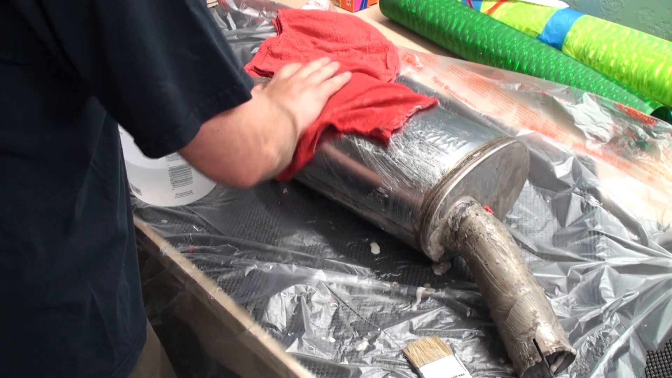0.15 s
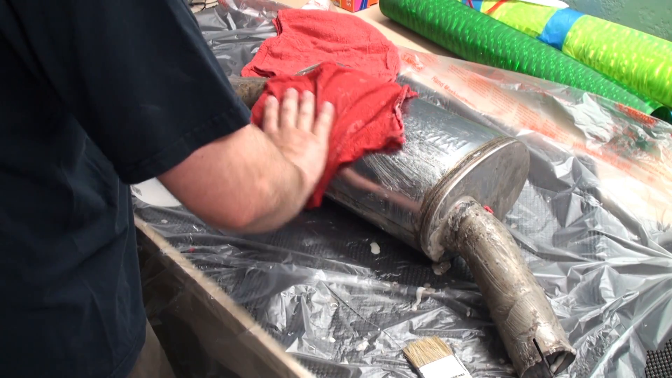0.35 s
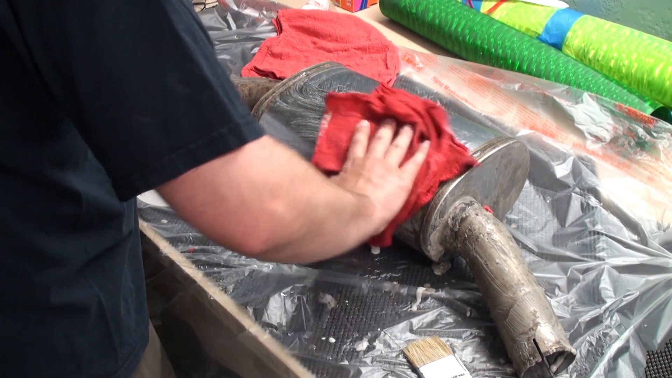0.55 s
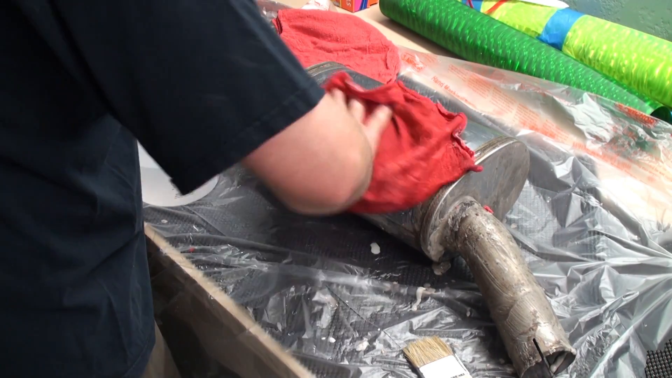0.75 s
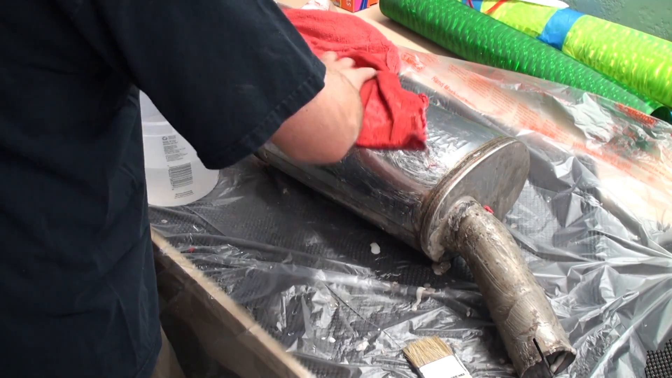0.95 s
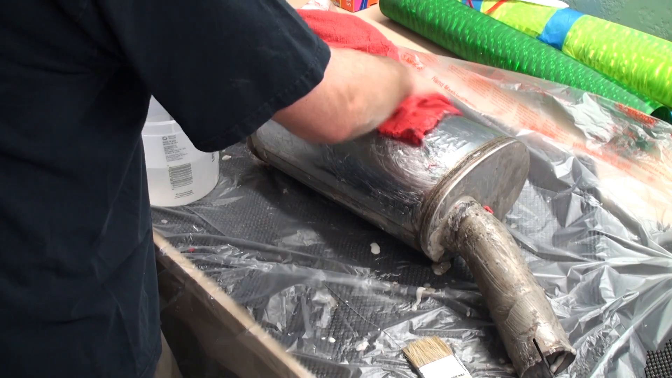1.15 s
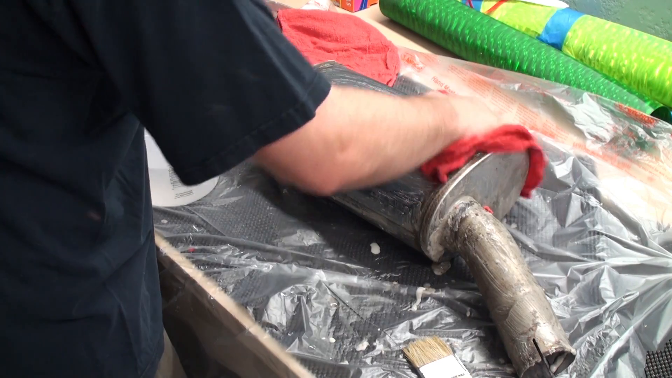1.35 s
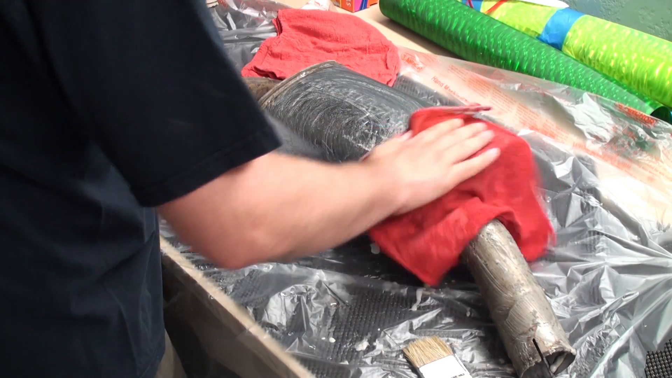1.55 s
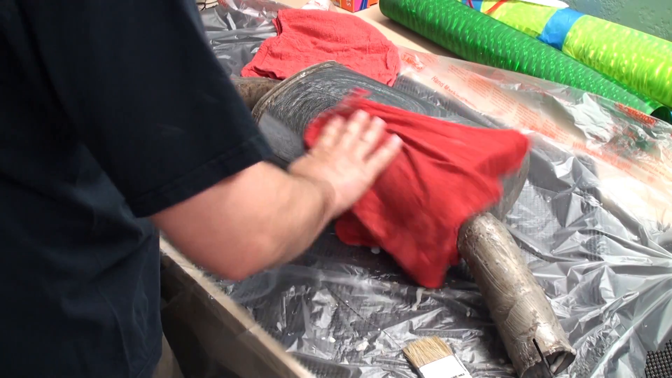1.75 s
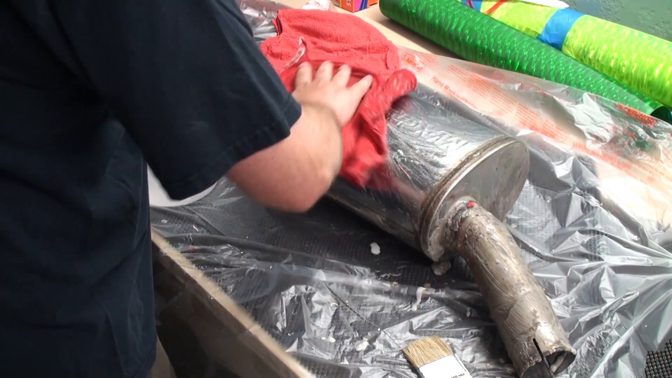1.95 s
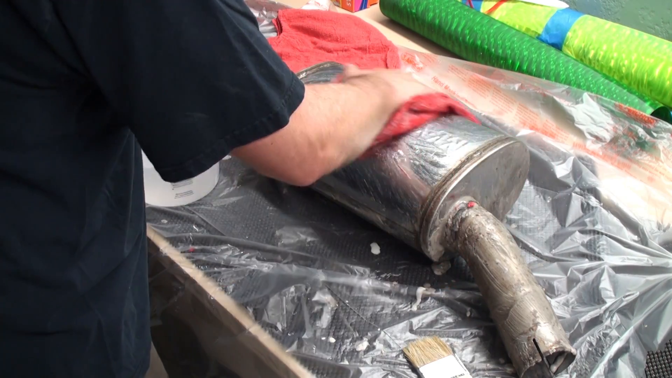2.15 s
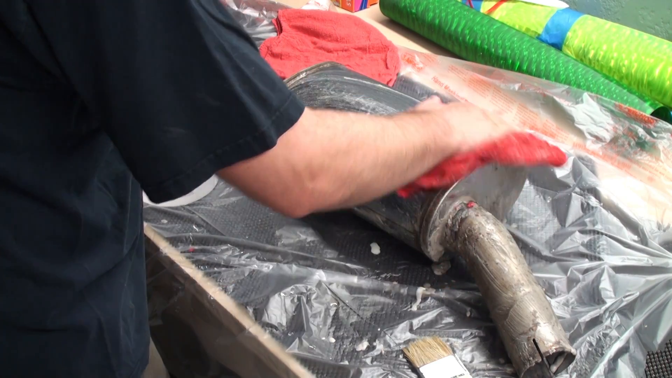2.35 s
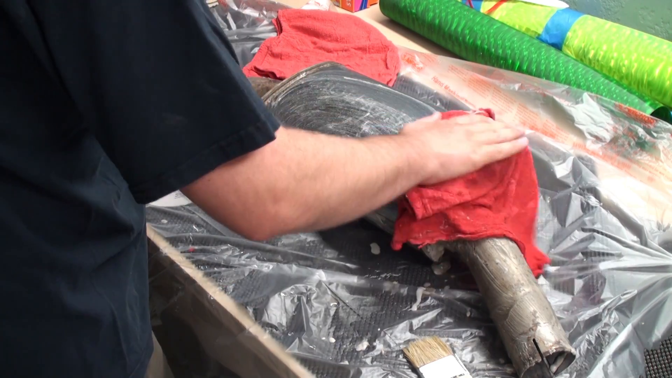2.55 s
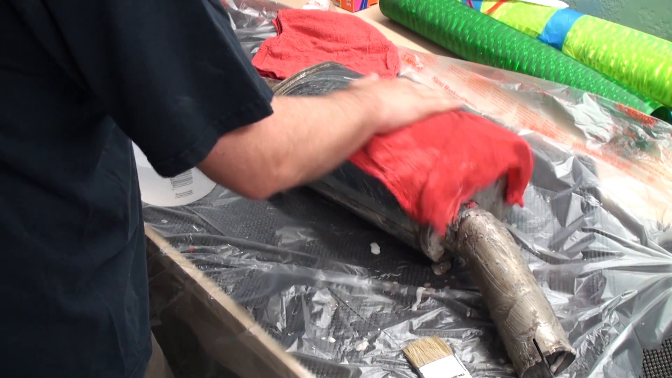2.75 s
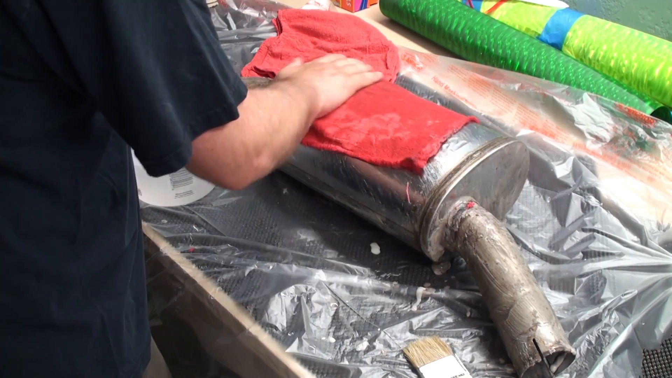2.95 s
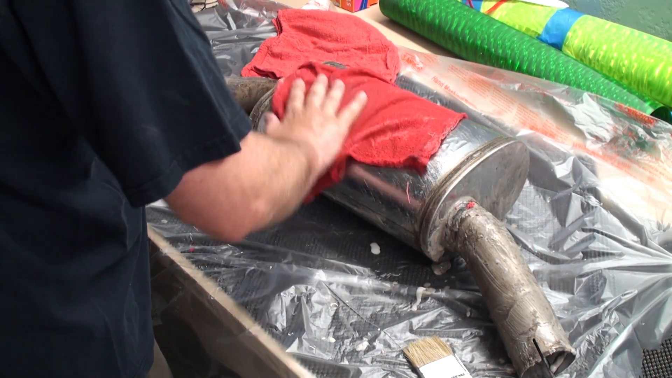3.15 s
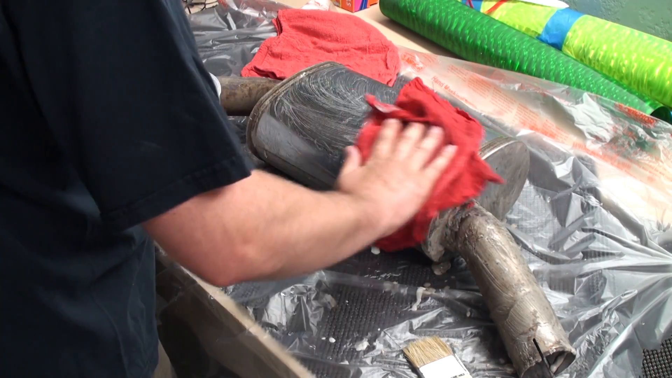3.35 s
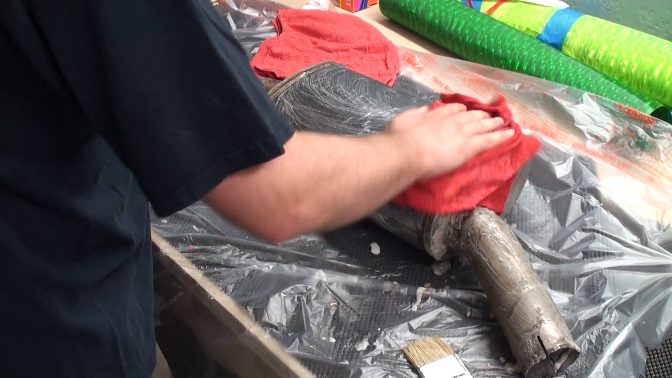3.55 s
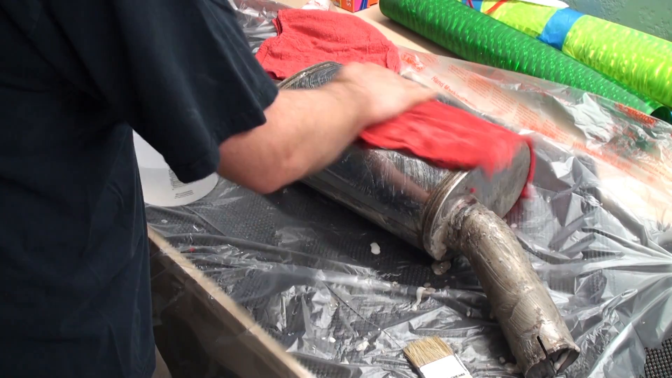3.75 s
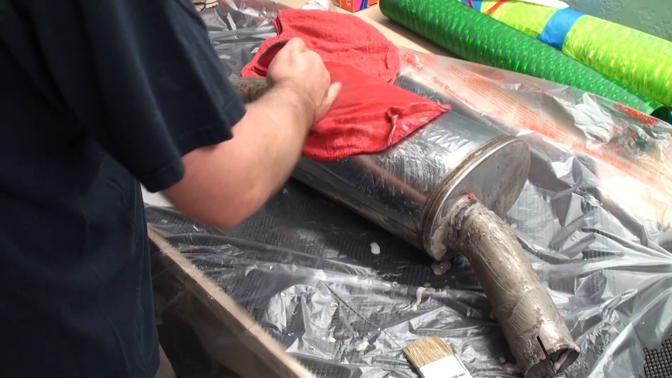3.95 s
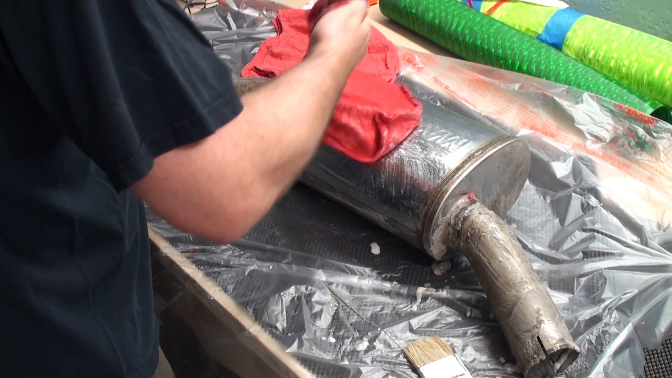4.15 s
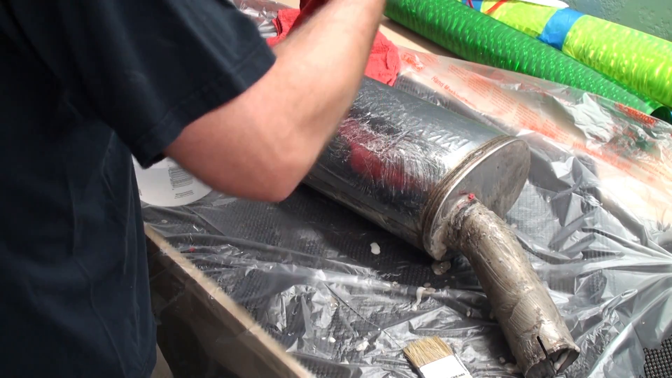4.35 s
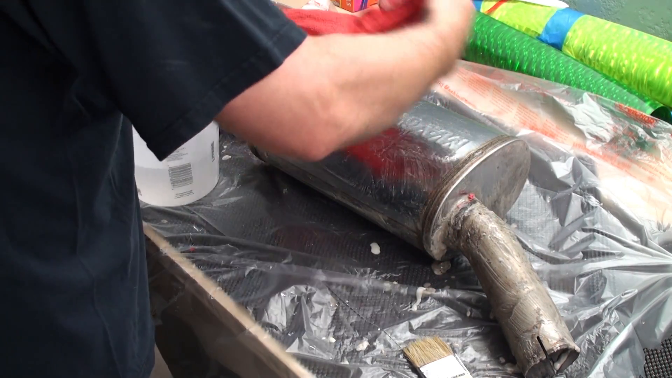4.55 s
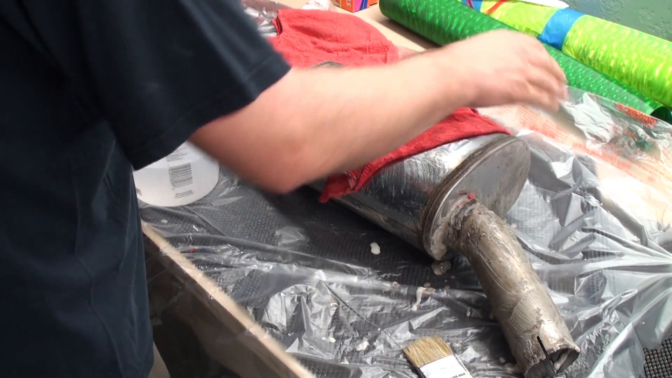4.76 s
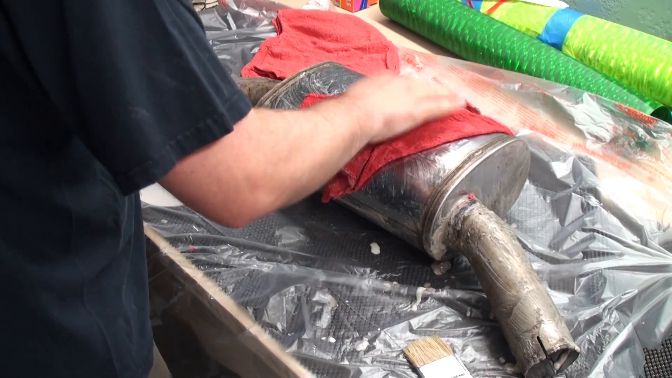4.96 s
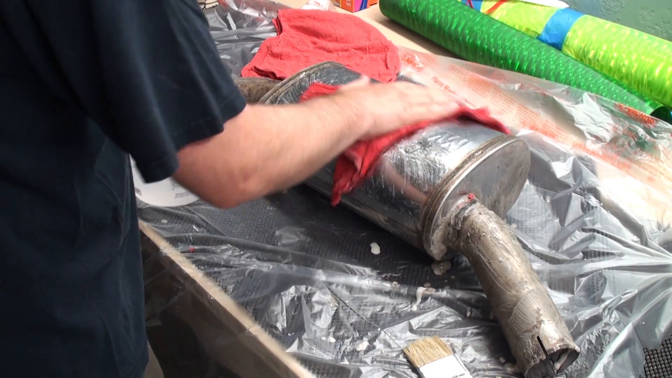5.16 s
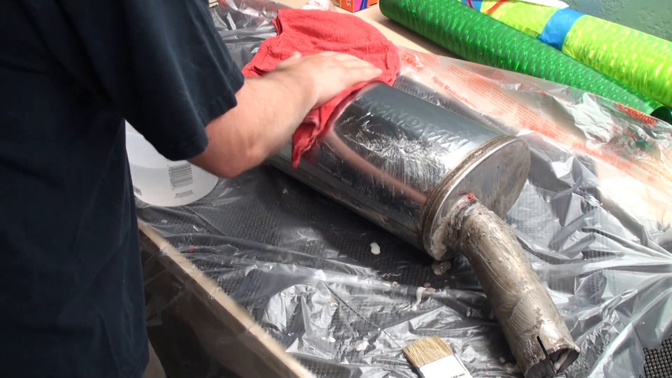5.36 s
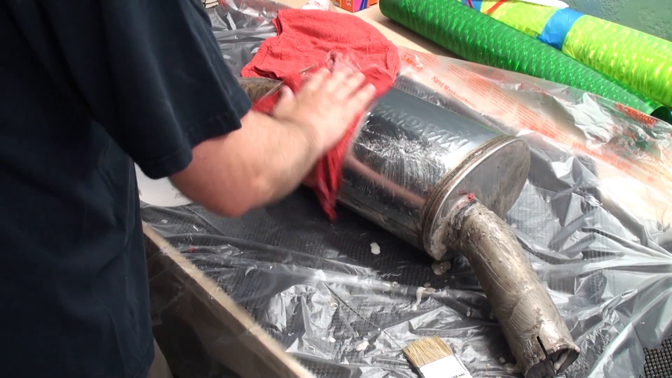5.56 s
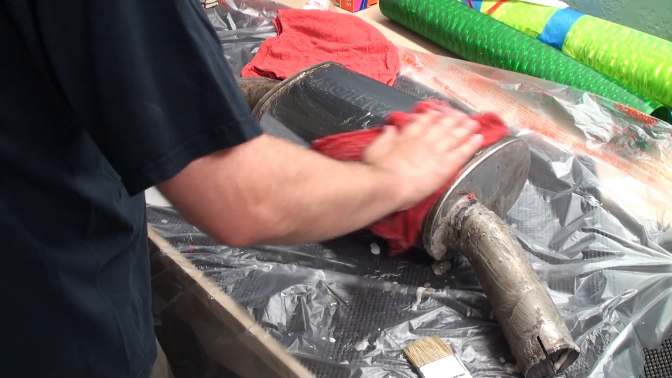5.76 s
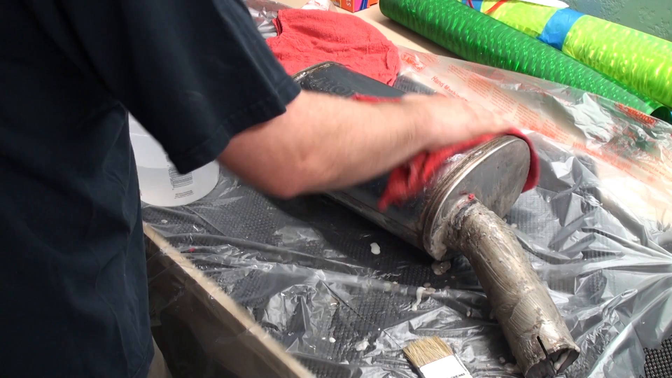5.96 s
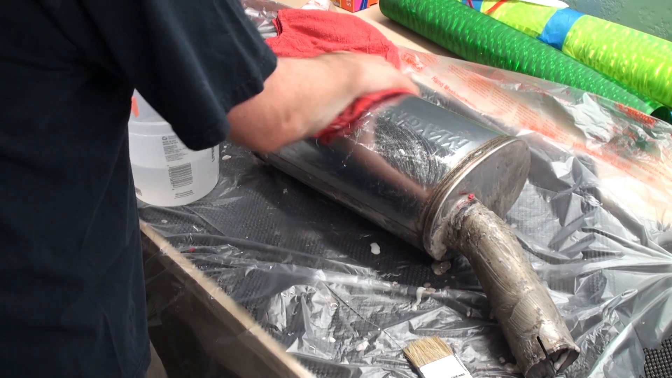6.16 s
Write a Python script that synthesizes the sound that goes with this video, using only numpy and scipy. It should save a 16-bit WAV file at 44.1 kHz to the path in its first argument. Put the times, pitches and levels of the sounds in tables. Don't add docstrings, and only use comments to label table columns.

```python
import sys
import numpy as np
from scipy import signal
from scipy.fft import rfft, irfft, next_fast_len
from scipy.io import wavfile
from scipy.ndimage import uniform_filter1d

SR = 44100
rng = np.random.default_rng(int(sys.argv[2]) if len(sys.argv) > 2 else 0)


def volts_from_decibels(level):
    exponent = np.asarray(level, float) / 20
    return 10 ** exponent


def master(y):
    cut = np.clip(np.atleast_2d(y).T, -1, 1)
    pcm = np.round(cut * 32767)
    wavfile.write(sys.argv[1], SR, pcm.astype(np.int16))


N = 273420


def evened(x):
    return x / np.sqrt(np.mean(x ** 2) + 1e-20)


def read(points, hz):
    f, value = np.transpose(points)
    return np.interp(np.log(hz + 1), np.log(f + 1), value)


def coloured(x, gain):
    size = next_fast_len(N)
    hz = np.fft.rfftfreq(size, 1 / SR)
    return irfft(rfft(x, size) * gain(hz), size)[..., :N]


def resonate(x, hz, width_hz):
    turn = np.exp(2j * np.pi * hz * np.arange(N) / SR)
    r = np.exp(-np.pi * width_hz / SR)
    return 2 * (turn * signal.lfilter([1 - r], [1, -r], x / turn)).real


def spikes(times, sizes):
    x = np.zeros(N)
    np.add.at(x, np.round(np.asarray(times) * SR).astype(int), sizes)
    return x


def swell(t, middle, length):
    return np.cos(np.pi * np.clip((t - middle) / length, -.5, .5)) ** 2


def bursts(train, length, count):
    shapes = rng.standard_normal((count, length)) * signal.windows.hann(length)
    which = rng.integers(0, count, N)
    out = np.zeros(N)
    for k, shape in enumerate(shapes):
        out += signal.oaconvolve(train * (which == k), shape / np.linalg.norm(shape))[:N]
    return out


def ringing(x, modes, rise_s=0.0023):
    t = np.arange(SR // 3) / SR
    tones = np.zeros(len(t))
    for k, (hz, db, t60) in enumerate(modes):
        tones += (-1) ** k * volts_from_decibels(db - 60 * t / t60) * np.sin(2 * np.pi * hz * t)
    return signal.fftconvolve(x, tones * (1 - np.exp(-t / rise_s)))[:N]


# pitch_hz, width_hz, level_db, wavering_share
HUM = [(58, 3, -68.5, 1.1), (93.3, 7, -71, 0.89), (120, 9, -62, 0.37), (138.2, 8.1, -57.5, 0.5),
       (238, 3.3, -76, 0.12)]


def hum():
    t, out = np.arange(N) / SR, 0
    for hz, width, db, waver in HUM:
        edge = evened(resonate(resonate(rng.standard_normal(N), hz, width), hz, width))
        core = np.sqrt(2) * np.sin(2 * np.pi * (hz * t + rng.random()))
        out += volts_from_decibels(db) * (core + waver * edge)
    return out


# pitch_hz, level_db (per Hz)
AIR = [(20, -29), (35, -13.5), (60, -5), (80, -5.5), (150, -3), (260, -8.5), (450, -14), (1500, -14),
       (2500, -16.5), (8000, -27), (12000, -26.5), (15700, -30)]
# pitch_hz, likeness (-1 to 1)
AIR_SAME = [(60, 0.99), (130, 1.0), (290, 0.93), (640, 0.18), (1410, 0.16), (3100, -0.35), (6820, 0.044),
            (15000, 0.77)]


def air(level_db=-54.5):
    a, b = rng.standard_normal((2, N))

    def same(hz):
        return np.clip(read(AIR_SAME, hz), -1, 1)

    mid = coloured(a, lambda hz: np.sqrt((1 + same(hz)) / 2))
    side = coloured(b, lambda hz: np.sqrt((1 - same(hz)) / 2))
    both = np.array([mid + side, mid - side])
    return volts_from_decibels(level_db) * evened(coloured(both, lambda hz: volts_from_decibels(read(AIR, hz))))


# start_s, level_db
THUDS = [
    (1.15, -45),
    (2.4, -44),
    (5.085, -37),
    (5.2, -43),
    (5.9, -60),
]


def bench():
    t = np.arange(SR // 3) / SR
    bump = np.sin(2 * np.pi * 61 * t) * np.minimum(t / 0.026, 1) * volts_from_decibels(-60 * t / 0.37)
    s, db = np.transpose(THUDS)
    return signal.fftconvolve(spikes(s, volts_from_decibels(db - 4)), bump)[:N]


# pitch_hz, t60_s
ROOM = [(250, 0.42), (800, 0.64), (2000, 0.55), (4000, 0.74), (12000, 0.47)]


def room():
    taps = np.zeros(SR // 2)
    at = np.arange(200, SR // 2 - 10, 10)
    taps[at + rng.integers(0, 10, len(at))] = rng.choice([-1., 1.], len(at))
    hz, t, z = signal.stft(taps, SR, nperseg=128)
    decay = volts_from_decibels(-60 * t / read(ROOM, hz)[:, None])
    out = signal.istft(z * decay, SR, nperseg=128)[1]
    return out / np.linalg.norm(out)


def near():
    echo = rng.standard_normal(400) * volts_from_decibels(-np.arange(400) / 18.0)
    return echo / np.linalg.norm(echo)


def shifting(x, echo, per_s):
    turn = 2 * np.pi * per_s * np.arange(N) / SR
    out = np.zeros(N)
    for k in range(3):
        feed = x * np.sqrt(2 / 3) * np.cos(turn + k * np.pi / 3)
        out += signal.fftconvolve(feed, echo())[:N]
    return out


# pitch_hz, side_minus_mid_db
SPREAD = [(100, -28), (300, -15), (600, -16), (1200, -13), (2000, -14.5), (4000, -16), (6500, -18),
          (8200, -14), (9800, -9), (11500, -5.5), (13000, -5.5), (15500, -10)]
# pitch_hz, left_minus_right_db
LEAN = [(150, 0), (450, .6), (1500, 1), (5500, .4), (9000, -.5), (12000, -2.5), (15000, -3)]


def in_stereo(close):
    mid = volts_from_decibels(-1.5) * close + volts_from_decibels(-10) * shifting(close, room, 3.1)
    loose = .75 * shifting(close, near, 7.3) + .6 * shifting(close, room, 3.7)
    side = coloured(loose, lambda hz: volts_from_decibels(read(SPREAD, hz)))
    side += coloured(mid, lambda hz: np.tanh(read(LEAN, hz) * np.log(10) / 40))
    return np.array([mid + side, mid - side])


# start_s, shell_db, caps_db (end caps re shell)
BLOWS = [(1.648, -58, 5), (1.781, -47, -17), (2.58, -66, -1), (2.822, -53, -8), (3.595, -47, -14),
         (3.685, -51.5, 6), (3.92, -48.5, -2.5), (4.716, -44, -7), (4.7435, -32, -15), (4.767, -31.5, -8),
         (4.803, -40, -13), (4.823, -38.5, -9.5), (5.22, -49, -19), (5.359, -43, -20), (5.817, -59, -8)]
# start_s, level_db
TAPS_820 = [(1.781, -46), (2.832, -40), (2.845, -45), (3.685, -48), (3.93, -47), (5.36, -50)]
TAPS_1500 = [(1.648, -44), (2.439, -44), (2.58, -44), (2.822, -38), (3.685, -45)]
# pitch_hz, level_db, t60_s
CAN_LOW = [(486.6, -10.5, 0.25), (518, -7.5, 0.14), (575.8, -4.5, 0.26), (617, -3, 0.15), (703, -22, 0.19),
           (946, -3, 0.044), (1334, -13, 0.046), (1420, -23, 0.055), (2060, -15, 0.057)]
CAN_HIGH = [(820, 0, .1), (1515, 0, .08)]
CAPS = [(244, -0.5, 0.15), (320, -4.5, 0.19), (447, -4.5, 0.24)]


def can(drive, ring):
    cloth_damping = .62
    shell = [(hz, db, cloth_damping * t60) for hz, db, t60 in CAN_LOW]
    s, db, caps_db = np.transpose(BLOWS)
    struck = ringing(spikes(s, volts_from_decibels(db + caps_db)), CAPS)
    struck += ringing(spikes(s, volts_from_decibels(db)), shell)
    struck += ringing(spikes(s, volts_from_decibels(db - 10)), CAN_HIGH)
    for taps, mode in zip((TAPS_820, TAPS_1500), CAN_HIGH):
        s, db = np.transpose(taps)
        struck += ringing(spikes(s, volts_from_decibels(db)), [mode])
    pressed = [(hz, db, .5 * t60) for hz, db, t60 in CAN_LOW[:5]]
    rubbed = ringing(drive, pressed) + volts_from_decibels(-11.5) * ringing(drive, CAN_HIGH)
    return struck + volts_from_decibels(-5.0) * ring * evened(rubbed)


# time_s, rubbing_db, weight_db (leaning on the can)
HAND = [(0.0, -43, 4), (.45, -42.5, -1.5), (.68, -50.5, -1), (.87, -44, -0.5), (.95, -39.5, 0),
        (1.6, -40.5, 2), (1.9, -40, -1.5), (2.15, -41.5, 1.5), (2.5, -40.5, 2.5), (3.25, -41, -1),
        (3.5, -40.5, -0.5), (3.98, -39, 0), (4.11, -55, 3), (4.45, -70, 1), (5.04, -73, 6),
        (5.085, -58, 3.5), (5.34, -44, 3.5), (6.2, -44.5, 2.5)]
# middle_s, fizz_db, length_s, sheen_db (re fizz), rasp_db (re fizz)
SWEEPS = [(.17, -38, 0.55, -17, -7), (0.578, -41, 0.21, -9, -7), (.79, -47.5, 0.16, -2, -7.5),
          (0.934, -50, 0.14, -9, -3), (1.147, -43.5, .12, -8, -6.5), (1.315, -39, 0.21, -7, -13),
          (1.487, -40, 0.18, -22, -8), (1.6, -35, 0.14, -17, -7.5), (1.804, -47, 0.2, 3, -10),
          (2.066, -42.5, 0.23, -11, -5.5), (2.343, -41.5, .12, -10, -8), (2.445, -41.5, .1, -10, -6.5),
          (2.965, -47, 0.17, -4, -3), (3.137, -41.5, 0.14, -5, -5.5), (3.386, -38, .14, -18, -14),
          (3.488, -37, .09, -20, -6), (3.6, -39, 0.36, -20, -5.5), (3.78, -55, 0.59, -9, 1.5),
          (3.97, -40.5, 0.15, 1.5, -26), (5.674, -44, 0.049, -9, -7), (5.788, -40, 0.19, -5.5, -6),
          (5.868, -43, .06, -8, -3.5), (6.038, -51.5, 0.19, -1, -1.5), (6.195, -41.5, 0.19, 2, -3)]
# middle_s, ring_db, length_s
RUBS = [(0.223, -57, 0.37), (.59, -54, 0.18), (0.827, -55, 0.27), (1.16, -48.5, .2), (1.303, -55, .15),
        (1.502, -55, .12), (1.707, -51, .2), (1.985, -48.5, .12), (2.14, -50, .2), (2.4, -53, 0.08),
        (2.633, -53, 0.13), (2.846, -48, 0.23), (3.144, -58, 0.11), (3.344, -57, 0.093),
        (3.498, -46.5, 0.095), (3.727, -48, 0.11), (3.91, -47.5, 0.19), (5.095, -55, 0.089),
        (5.366, -49, .2), (5.71, -47, 0.19), (5.885, -49, 0.081), (6.16, -46.5, 0.18)]
# start_s, fizz_db, rise_s, rasp_db (re fizz), sheen_db (re fizz)
CATCHES = [
    (0.686, -39.5, 0.0027, -11.5, -17),
    (1.6417, -25.5, .0075, -9, -6.5),
    (2.575, -22, 0.014, -8.5, -4),
    (3.682, -32, 0.0048, -28, -2),
    (4.698, -54, 0.0027, -2, -1),
    (4.722, -58.5, 0.0047, 2.5, -10),
    (4.743, -43.5, 0.0023, 4, -17),
    (4.767, -46, 0.0055, -6, -16),
    (5.35, -37, 0.012, -6.5, -2.5),
]
RESTING_DB = [-14.5, -7.5, 0, -8, -15]
PER_WEIGHT = [1.36, 0.89, 0, -0.17, 0.63]


def pressure():
    t = np.arange(0, N + 16, 16) / SR
    s, rub_db, weight_db = np.transpose(HAND)
    leaning = np.c_[PER_WEIGHT] * np.interp(t, s, weight_db)
    power = volts_from_decibels(np.interp(t, s, rub_db) + np.c_[RESTING_DB] + leaning) ** 2
    for at, db, length, sheen_db, rasp_db in SWEEPS:
        drag_db = 2.6 * rasp_db
        levels = np.c_[[drag_db, rasp_db, 0, sheen_db]]
        power[:4] += volts_from_decibels(db + levels) ** 2 * swell(t, at, length)
    for at, db, length in RUBS:
        power[4] += volts_from_decibels(db) ** 2 * swell(t, at, length)
    for at, db, rise, rasp_db, sheen_db in CATCHES:
        since = np.maximum(t - at, 0)
        t60 = min(0.21 + 11.8 * rise, .33)
        shape = np.minimum(since / rise, 1) * volts_from_decibels(-60 * np.maximum(since - rise, 0) / t60)
        levels = np.c_[[1.54 * rasp_db, 0.66 * rasp_db, 0, sheen_db]]
        power[:4] += (volts_from_decibels(db + levels) * shape) ** 2
    *gains, ring = (np.interp(np.arange(N) / SR, t, np.sqrt(p)) for p in power)
    return gains, ring


def slips(per_s=14000, spread_db=2.0, flutter_db=.6):
    size = volts_from_decibels(spread_db * np.minimum(rng.exponential(1, N), 5))
    wander = uniform_filter1d(rng.standard_normal(N), size=500)
    grip = evened(uniform_filter1d(wander, size=300))
    letting_go = rng.random(N) < per_s / SR
    return evened(bursts(size * letting_go * volts_from_decibels(flutter_db * grip), length=22, count=24))


# start_s, peak_db
SNAPS = [(1.648, -18), (1.678, -7), (1.808, -24), (1.832, -7), (2.5777, 2), (2.586, -11), (2.6054, -15),
         (2.6154, -13), (2.766, -18), (3.6244, -6), (3.6294, -9), (4.138, -22), (4.145, -17), (4.685, -23),
         (4.699, -17), (4.704, -24), (5.3614, -36), (5.3714, -27), (5.3858, -24)]
# pitch_hz, level_db (per Hz)
FIZZ = [(150, -26), (300, -19), (700, -14), (1500, -8.5), (3000, -8), (5000, -4.5), (7000, -4), (8500, -6),
        (10000, -9), (11300, -8.5), (13000, -15), (14500, -18.5), (15700, -27)]


def under(hz, edge_hz):
    return 1 / (1 + (hz / edge_hz) ** 6)


def rag(drive, gains):
    ranges = (lambda hz: under(hz, 1950),
              lambda hz: under(hz, 4270) - under(hz, 2200),
              lambda hz: under(hz, 12850) - under(hz, 4100),
              lambda hz: 1 - under(hz, 8340))
    s, db = np.transpose(SNAPS)
    snaps = bursts(spikes(s, volts_from_decibels(db + 2)), length=26, count=9)
    out = coloured(snaps, lambda hz: volts_from_decibels(read(FIZZ, hz)))
    for gain, part in zip(gains, ranges):
        out += gain * evened(coloured(drive, lambda hz: volts_from_decibels(read(FIZZ, hz)) * part(hz)))
    return out


def scene():
    drive = slips()
    gains, ring = pressure()
    close = rag(drive, gains) + can(drive, ring)
    return in_stereo(close) + hum() + bench() + air()


def top_cut(x):
    return signal.sosfilt(signal.butter(12, 15860, fs=SR, output="sos"), x)


def record(dry):
    edge_hz, slope_hz = 15720, 60
    limited = coloured(dry, lambda hz: np.clip((edge_hz - hz) / slope_hz + 1, 0, 1))
    return top_cut(limited)


dry = scene()
out = record(dry)
master(out)
```